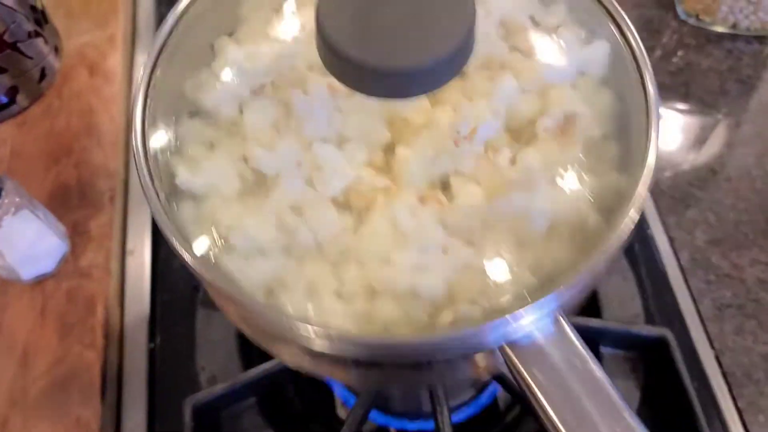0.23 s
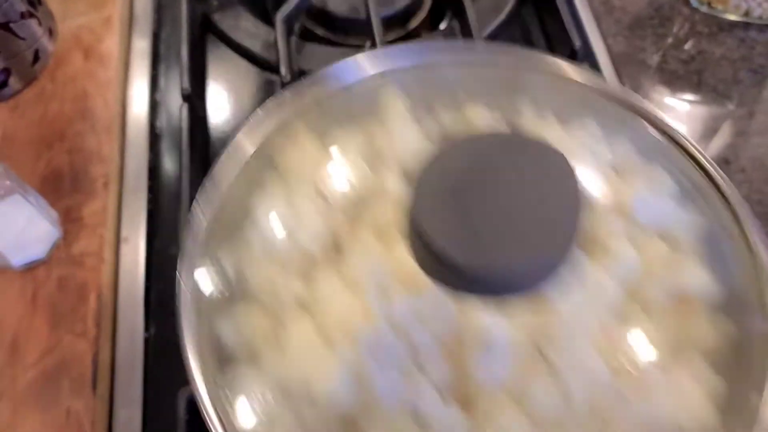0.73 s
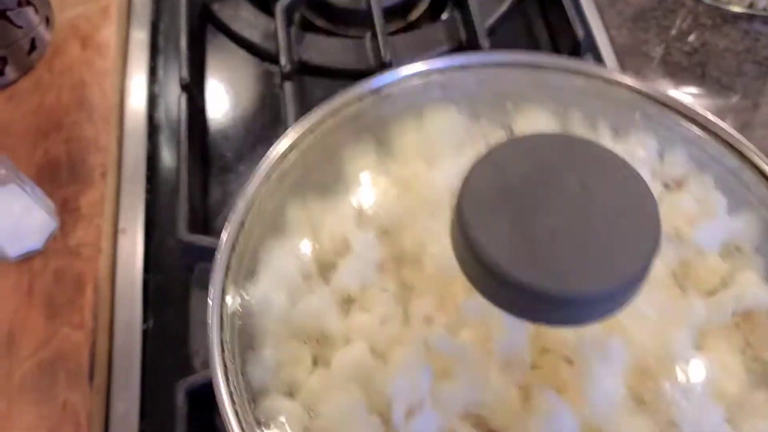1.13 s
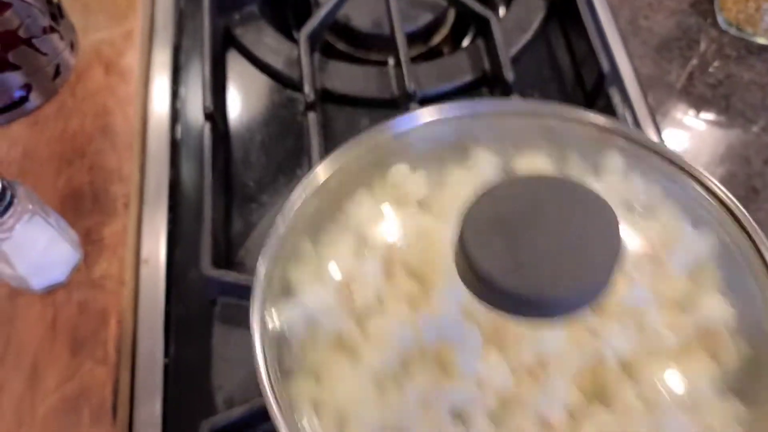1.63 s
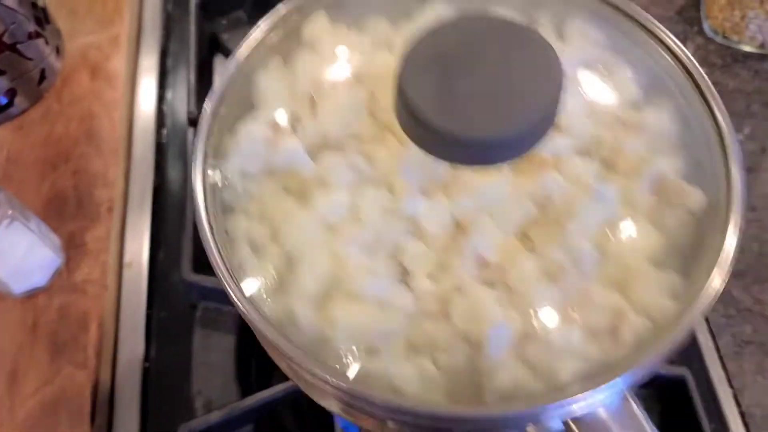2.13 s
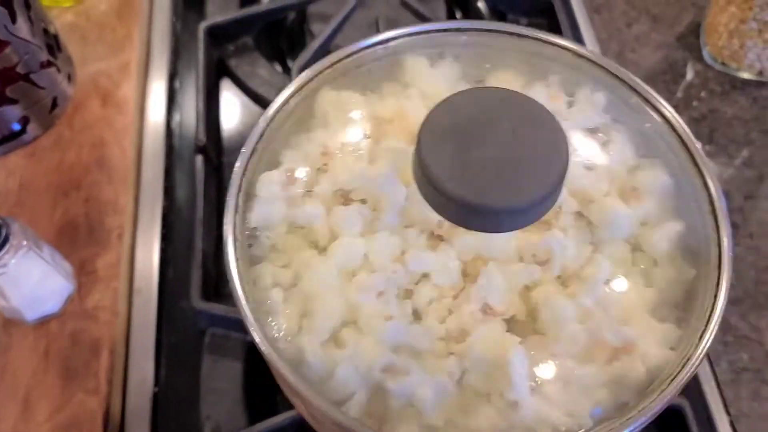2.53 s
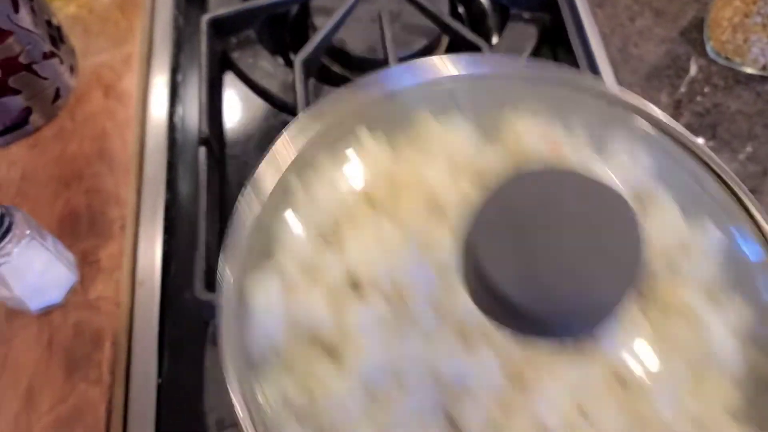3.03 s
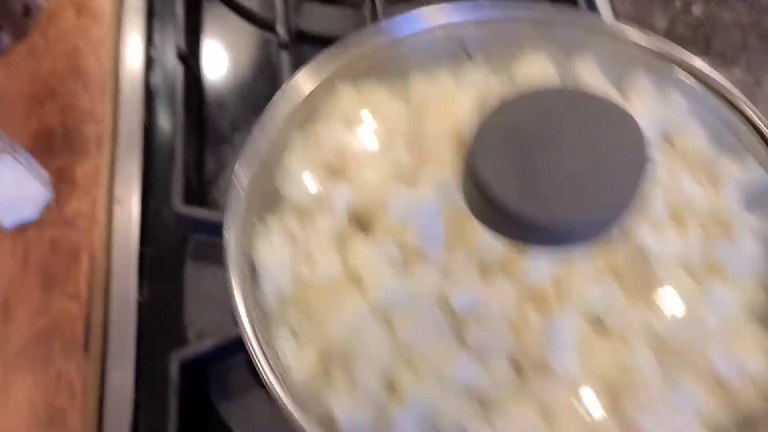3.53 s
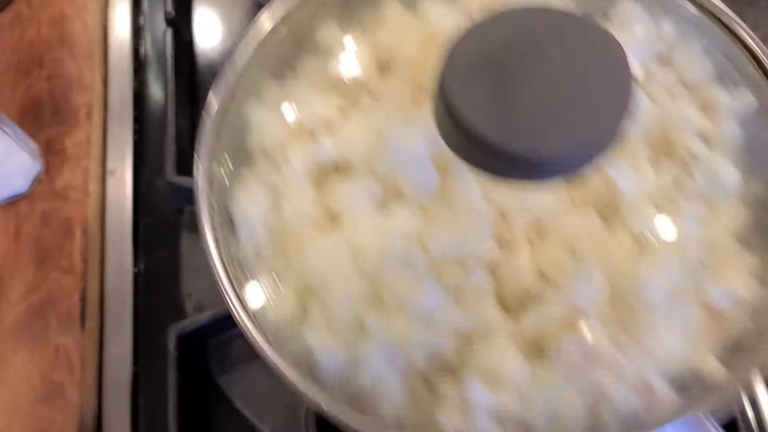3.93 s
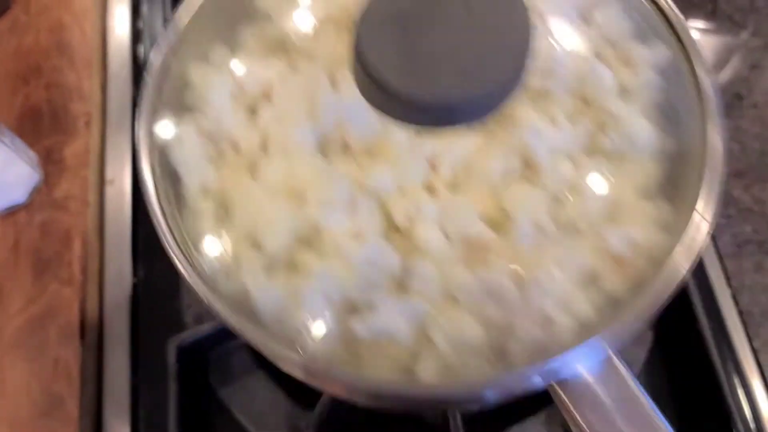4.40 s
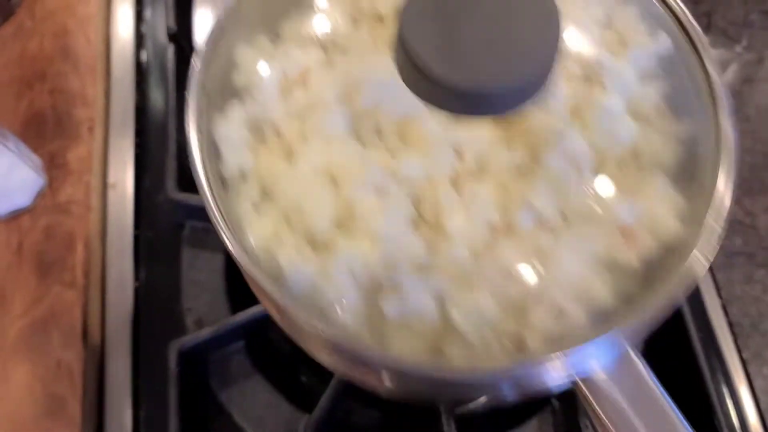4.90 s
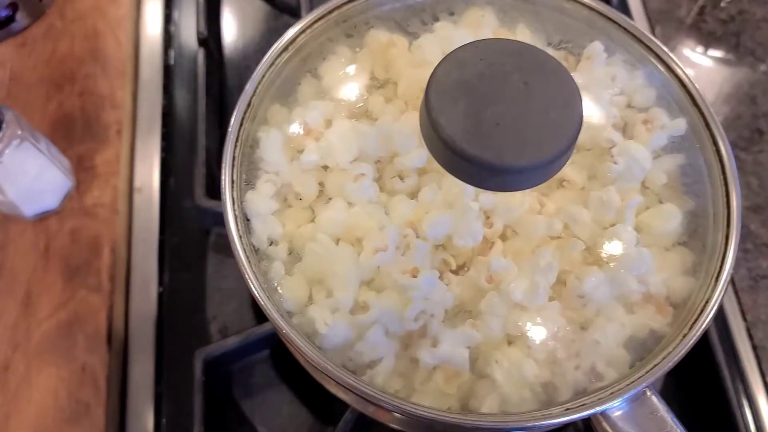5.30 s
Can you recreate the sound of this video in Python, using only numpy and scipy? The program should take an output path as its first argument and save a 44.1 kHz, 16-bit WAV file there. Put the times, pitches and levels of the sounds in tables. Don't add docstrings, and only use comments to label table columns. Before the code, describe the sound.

A steel pot of popcorn with a glass lid is shaken about five times a second, very close. Each stroke throws kernels in a dense, crunchy burst of metallic ticks, with low hollow thumps, lid knocks and occasional pops. A soft flame roars underneath. After five seconds the shaking stops and the pot clatters to rest in a small live kitchen.

```python
import sys
import numpy as np
from scipy import signal
from scipy.fft import rfft, irfft
from scipy.io import wavfile
from scipy.ndimage import uniform_filter1d

SR = 44100
rng = np.random.default_rng(int(sys.argv[2]) if len(sys.argv) > 2 else 0)


def store_wav(level_fs):
    pcm = np.round(np.clip(np.atleast_2d(level_fs), -1, 1) * 32767)
    wavfile.write(sys.argv[1], SR, pcm.T.astype(np.int16))


def natural_amplitude(level_db):
    exponent = np.asarray(level_db, float) / 20
    return 10 ** exponent


N = 245061

AIR_HZ = [215, 245, 321, 371, 393]
# (time [s], level [dB], fall time [ms], air thump [dB], strongest ring [Hz])
THROWS_AWAY = [(0.0336, -13, 6.5, -36.5, 2135), (.443, -15, 8.5, -35.5, 3510),
               (0.816, -15.5, 14.5, -27, 2130), (1.172, -15.5, 12.5, -29, 2110),
               (1.576, -18, 24, -36, 2770), (1.701, -17.5, 21, -22, 2470), (1.9929, -14, 9.5, -37, 2023),
               (2.3669, -17, 19.5, -28, 2092), (2.7602, -15, 17, -32, 2000), (3.1362, -14, 8, -33, 3650),
               (3.513, -13.5, 23, -25.5, 3790), (3.8976, -13.5, 13.5, -29, 2080),
               (4.2775, -19, 20.5, -34.5, 2000), (4.6678, -18, 11.5, -34.5, 1853),
               (5.0352, -20.5, 22, -32.5, 1660)]
# (time [s], level [dB], low push [dB], air thump [dB], air pitch [Hz])
POPS = [(0.1926, -27, -26, -27, 310), (0.3588, -26, -31, -36, 333), (.489, -19.5, -18.5, -30, 178),
        (1.1556, -23, -18, -25.5, 355), (1.5683, -26, -24, -20, 286), (1.6332, -23, -47, -21.5, 215),
        (1.8602, -23, -19.5, -30, 353), (2.0897, -38, -33, -34, 310), (2.2531, -23, -19.5, -27, 315),
        (2.532, -20.5, -26, -29.5, 348), (3.1963, -21.5, -25.5, -30, 310), (3.5797, -23.5, -17, -30, 314),
        (3.6547, -22.5, -21, -24.5, 222), (4.3442, -31.5, -23, -24.5, 223)]
# (time [s], level [dB], ring [Hz], air thump [dB], air pitch [Hz])
LID_POPS = [(.1375, -23.5, 1333, -30, 310), (1.1189, -24, 1470, -36, 408),
            (1.2083, -25.5, 3200, -22.5, 338), (1.5327, -26.5, 1350, -35.5, 314),
            (3.066, -22.5, 1670, -26, 348), (3.8333, -27, 1610, -32, 375), (5.0281, -23.5, 1466, -28, 350)]
# (time [s], level [dB], treble over level [dB], ring [Hz], air pitch [Hz])
RESTS = [
    (5.229, -25.5, -28, 1700, 309),
    (5.267, -22.5, -3.5, 3390, 381),
    (5.4135, -26, -17.5, 1667, 371),
]


def kernels(spots=8):
    # (frequency [Hz], level per Hz [dB])
    tick_colour = [(300, -4), (600, -10.5), (1000, -4), (2200, -8), (4000, -13.5), (5500, -20.5),
                   (8000, -45), (10000, -27)]
    # (frequency [Hz], level [dB], t60 [s])
    pot_modes = [(1112, -26, 0.14), (1398, -10, 0.094), (1670, 0.5, 0.083), (2060, -9, 0.18),
                 (2700, -13, 0.24), (2774, -5.5, 0.048), (3630, 0, 0.041), (6047, 0.5, 0.036),
                 (7000, -4, 0.054)]
    # (frequency [Hz], level [dB], t60 [s])
    rim_modes = [(8350, 10.5, 0.066), (11200, 2, 0.04)]
    # (frequency [Hz], level [dB], t60 [s])
    lid_modes = [(3390, -6, 0.092), (5260, -12.5, 0.066), (6540, -2.5, 0.035), (7540, -5.5, 0.081)]
    # (frequency [Hz], level [dB])
    ear_lean = [(500, -3.5), (1300, 4), (2400, 5.5), (6000, 9.5), (14000, -1.5)]
    ticks_per_s, bunch_db = 2200, 2
    air_db, air_t60_s = -11, 0.048

    size = evened(natural_amplitude(2.35 * np.minimum(rng.exponential(1, N), 3)) * (rng.random(N) < ticks_per_s / SR))
    size *= natural_amplitude(bunch_db * evened(uniform_filter1d(rng.standard_normal(N), size=160)) - 1.5)
    heads_s = np.array(bursts())[:, 0]
    size[np.round(heads_s * SR).astype(int) + 1] += 9.0
    ticks = size * rng.choice([-1., 1.], N)

    (wall, treble, lid, slide), favoured = swells(ticks)
    scrape = evened(band(size * rng.standard_normal((2, N)), 640, 1930))
    out = favoured + slide * scrape
    spot = rng.integers(0, spots, N)
    for k in range(spots):
        train = (ticks * (spot == k))[None]
        dull, fine = rng.standard_normal((2, 2, 6000))
        hard = colour(dull, tick_colour)
        knock = natural_amplitude(-3.5) * crack(hard, 0.0047) + natural_amplitude(-5.0) * crack(hard, 0.00036)
        knock += natural_amplitude(-7.5) * ring(pot_modes, 6.1, 0.00984)
        snap = crack(band(fine, 4600, 20700), 0.009) + natural_amplitude(-8.5) * ring(rim_modes, 0.69, 0.0101)
        glass = ring(lid_modes, 1.0, 0.0069)
        for strength, shape in ((wall, knock), (treble, snap), (lid, glass)):
            out += signal.oaconvolve(train * strength, shape, axes=1)[:, :N]

    air = ring([(hz, 0, air_t60_s) for hz in AIR_HZ], 2.3, 0.016)[0]
    out += natural_amplitude(air_db) * signal.oaconvolve(ticks * wall, air)[:N]
    lean = np.array(ear_lean) * [1, .5]
    return natural_amplitude(2.5) * np.array([colour(out[0], lean), colour(out[1], lean * [1, -1])])


def swells(ticks):
    lead_s = .05
    power, favoured = np.zeros((4, N + SR)), np.zeros((2, N + SR))
    t = np.arange(-lead_s, .2, 1 / SR)
    start = round(lead_s * SR)
    padded = np.pad(ticks, (start, SR))
    for s, db, treble_db, hz, fall_ms, ring_db in bursts():
        fall_ms = max(fall_ms, 2)
        blow = natural_amplitude(db + np.where(t < 0, 90000 * t / fall_ms - 7.0, -11000 * t / fall_ms))
        settle = (t > 0) * natural_amplitude(db - 14 - 510 * t)
        add(power[:2], s, natural_amplitude([[0], [treble_db]]) ** 2 * (blow ** 2 + settle ** 2))
        lid_db = 1.72 * min(treble_db, -3) + 2.0
        add(power[2], s, (blow * natural_amplitude(lid_db)) ** 2)
        strikes = (blow * padded[round(s * SR):][:len(t)])[None]
        mode = ring(2 * [(hz, 0, .05)], 2.5, 0.013)[:, :3000]
        add(favoured, s, natural_amplitude(ring_db) * signal.oaconvolve(strikes, mode, axes=1))
    for s, db, *_ in THROWS_AWAY:
        add(power[3], s, (t < 0) * natural_amplitude(db - 11 + 700 * t) ** 2)
    return np.sqrt(power[:, start:start + N]), favoured[:, start:start + N]


def crack(scatter, decay_s):
    return unit(scatter * np.exp(-np.arange(6000) / SR / decay_s))


def ring(modes, spread_db, detune):
    t = np.arange(6000) / SR
    hz, db, t60 = np.transpose(modes)[:, :, None]
    hz = hz * (1 + detune * rng.standard_normal(hz.shape))
    height_db = db + spread_db * rng.standard_normal((2, len(modes), 1))
    phase = 2 * np.pi * rng.random((2, len(modes), 1))
    tones = natural_amplitude(height_db - 60 * t / t60) * np.sin(2 * np.pi * hz * t + phase)
    onset = 1 - np.exp(-t / 0.000098)
    return unit(tones.sum(1) * onset)


def bursts():
    # (time [s], level [dB], fall time [ms], ring [Hz])
    lid_knocks = [(.221, -33, 17, 1780), (.625, -25, 3.5, 1790), (.9736, -22.5, 21, 1660),
                  (1.3607, -23, 3, 1780), (1.5528, -32, 36, 1390), (1.761, -35, 15, 2700),
                  (2.169, -29.5, 7.5, 1760), (2.483, -34.5, 18, 2440), (2.5452, -24, 12, 2700),
                  (2.9364, -31.5, 8, 2770), (3.3125, -31.5, 9, 2680), (3.6864, -34.5, 9, 1100),
                  (3.7577, -33, 0, 2770), (4.074, -32.5, 10, 2780), (4.4529, -30, 7, 2840),
                  (4.848, -35, 29, 2730)]
    # (time [s], level [dB])
    oil_spits = [
        (.5402, -49),
        (2.104, -49),
        (2.129, -47),
        (4.18, -59),
        (4.5649, -50),
    ]
    lands = [(s, db, kind[0], hz, fall_ms, kind[1]) for s, db, fall_ms, hz, _, _, kind in loads()]
    pops = [(s, db, -6.5, 1415, 8.1, -11) for s, db, *_ in POPS]
    lid_pops = [(s, db, -8, hz, 10.5, -0.5) for s, db, hz, *_ in LID_POPS]
    knocks = [(s, db, -36, hz, fall_ms, -2) for s, db, fall_ms, hz in lid_knocks]
    spits = [(s, db, 11, 2700, 3, -10) for s, db in oil_spits]
    rests = [(s, db, treble_db, hz, 22.3, -4) for s, db, treble_db, hz, _ in RESTS]
    return lands + pops + lid_pops + knocks + spits + rests


def loads():
    # (time [s], level [dB], fall time [ms], air thump [dB], air pitch [Hz])
    throws_back = [(0.2531, -16, 16.5, -29, 290), (0.6488, -15.5, 15, -23, 259),
                   (1.0063, -15, 16, -27, 324), (1.3875, -17.5, 8.5, -27.5, 276),
                   (1.7995, -16, 16.5, -26, 215), (2.198, -15, 17, -34, 312),
                   (2.577, -15.5, 11.5, -22.5, 223.6), (2.9668, -17, 18.5, -26.5, 300),
                   (3.3415, -15.5, 12.5, -23.5, 227), (3.7252, -17, 13, -28, 321),
                   (4.108, -15.5, 17, -26, 230), (4.4857, -15.5, 14, -30, 223),
                   (4.8801, -17, 14, -26.5, 235.6)]
    # (time [s], level [dB], fall time [ms], air thump [dB], air pitch [Hz])
    clumps = [(0.0251, -27, 18, -31.5, 422), (.055, -23.5, 3, -31, 263), (.2701, -26, 15, -48, 290),
              (0.427, -24.5, 39, -31, 396), (.452, -21, 17, -36, 408), (.67, -17, 5, -42, 240),
              (0.841, -29, 0, -33, 274), (1.0135, -23, 9, -47, 264), (1.0282, -25.5, 7, -27.5, 248),
              (1.1888, -21.5, 25.5, -35, 240), (1.3949, -17.5, 15.5, -36, 248),
              (1.7128, -15, 16.5, -35, 302), (1.985, -29, 12, -27, 325), (2.215, -23, 4, -29.5, 220),
              (2.6066, -33, -2, -38, 245), (3.1572, -17, 5, -31.5, 312), (3.3615, -27, 21, -30, 283),
              (4.094, -26.5, 17, -25.5, 230), (4.272, -30, 3, -26.5, 326), (4.505, -18.5, 3.5, -31, 302),
              (4.659, -32.5, 17, -32, 305), (4.91, -34.5, 22, -44, 243), (5.0575, -18.5, 9, -38.5, 302),
              (5.0634, -17.5, 10.5, -26, 298)]
    # (treble over level [dB], ring over level [dB], air t60 [s], low push over level [dB])
    away = (-14, -7.5, 0.08, -24)
    back = (-13, -8.5, 0.05, -37)
    clump = (-15, -7, 0.03, -20)
    away_air_hz, back_ring_hz, clump_ring_hz = 223, 2770, 2708
    far = [(s, db, fall_ms, hz, air_db, away_air_hz, away) for s, db, fall_ms, air_db, hz in THROWS_AWAY]
    near = [(s, db, fall_ms, back_ring_hz, air_db, hz, back) for s, db, fall_ms, air_db, hz in throws_back]
    loose = [(s, db, fall_ms, clump_ring_hz, air_db, hz, clump) for s, db, fall_ms, air_db, hz in clumps]
    return far + near + loose


def thumps():
    air, pot = np.zeros(N), np.zeros(N)
    t = np.arange(0, .25, 1 / SR)
    for s, db, hz, t60, push_db in jolts():
        pick, phase = rng.random(2)
        fade = natural_amplitude(db + 14.5 - 60 * t / t60) * (1 - np.exp(-t / 0.0019))
        other_hz = AIR_HZ[int(pick * len(AIR_HZ))]
        tones = np.sin(2 * np.pi * hz * t) + .5 * np.sin(2 * np.pi * (other_hz * t + phase))
        add(air, s - .001, fade * tones)
        push_hz = 95 + 45 * phase
        add(pot, s - .001, natural_amplitude(push_db + 6 - 60 * t / 0.03) * np.sin(2 * np.pi * push_hz * t))
    return band(air, 128, 1250) + pot


def jolts():
    lag_s = lead_s = .0015
    lands = [(s + lag_s, air_db, hz, kind[2], db + kind[3]) for s, db, _, _, air_db, hz, kind in loads()]
    pops = [(s - lead_s, air_db, hz, 0.032, push_db) for s, _, push_db, air_db, hz in POPS]
    lid_pops = [(s - lead_s, air_db, hz, 0.082, db + 2.5) for s, db, _, air_db, hz in LID_POPS]
    rests = [(s - lead_s, -23, hz, 0.068, -27) for s, *_, hz in RESTS]
    return lands + pops + lid_pops + rests


def simmer():
    # (frequency [Hz], level per Hz [dB])
    flame_colour = [(24, -44), (40, 3), (220, 0), (329, 0), (556, -9.5), (2700, -3), (3060, -5.5),
                    (13800, -28), (16000, -56)]
    # (time [s], level [dB])
    steam = [
        (.4, -53),
        (.8, -72),
        (1.75, -64),
        (1.95, -48),
        (2.25, -45),
        (2.6, -79),
        (5.56, -81),
    ]
    s, hiss_db = np.transpose(steam)
    noise = rng.standard_normal((2, N))
    noise += 2.5 * band(rng.standard_normal(N), 30, 720)
    flicker_db = 2.0 * evened(uniform_filter1d(rng.standard_normal(N), 1500))
    roar = evened(colour(noise, flame_colour)) * natural_amplitude(-47 + flicker_db)
    hiss = evened(band(rng.standard_normal((2, N)), 5900, 21500))
    hiss *= natural_amplitude(np.interp(np.arange(N) / SR, s, hiss_db))
    spurts = np.repeat(rng.exponential(1, N // 32 + 1), 32)[:N]
    return roar + hiss * natural_amplitude(2.9 * np.minimum(spurts, 5) - 5)


def kitchen(x):
    # (frequency [Hz], t60 [s])
    tail_t60 = [(100, 0.36), (2500, 0.37), (6000, 0.42), (14000, 0.26)]
    out, turn = np.zeros((2, N)), np.pi * 2.3 * np.arange(N) / SR
    for k in range(3):
        taps = np.zeros((2, SR // 2))
        at = np.arange(200, SR // 2 - 20, 20) + rng.integers(0, 20, (2, (SR // 2 - 201) // 20))
        np.put_along_axis(taps, at, rng.choice([-1., 1.], at.shape), 1)
        hz, t, z = signal.stft(taps, SR, nperseg=256)
        fade = natural_amplitude(-60 * t / read(tail_t60, hz)[:, None])
        tail = signal.istft(z * fade, SR, nperseg=256)[1]
        share = np.sqrt(2 / 3) * np.cos(turn + k * np.pi / 3)
        out += signal.fftconvolve(x * share, unit(tail), axes=1)[:, :N]
    return out


def evened(x):
    return x / np.sqrt(np.mean(x ** 2) + 1e-20)


def unit(x):
    return x / np.linalg.norm(x, axis=-1, keepdims=True)


def read(points, hz):
    f, value = np.transpose(points)
    return np.interp(np.log(hz + 1), np.log(f + 1), value)


def colour(x, points):
    size = x.shape[-1]
    return irfft(rfft(x) * natural_amplitude(read(points, np.fft.rfftfreq(size, 1 / SR))), size)


def band(x, lo_hz, hi_hz, order=2):
    return signal.sosfilt(signal.butter(order, [lo_hz, hi_hz], "band", fs=SR, output="sos"), x)


def add(mix, s, sound):
    part = mix[..., round(max(s, 0) * SR):][..., :sound.shape[-1]]
    part += sound[..., :part.shape[-1]]


def scene():
    ticks, air = kernels(), thumps()
    echo = kitchen(natural_amplitude(-15.5) * ticks + natural_amplitude(-9.5) * air[None])
    return ticks + air + echo + simmer()


def band_limit(x):
    return signal.sosfilt(signal.butter(12, 16620, fs=SR, output="sos"), x)


def record(dry):
    # (frequency [Hz], level [dB])
    port_difference = [(100, -14), (450, -7.5), (1300, -0.5)]
    # (frequency [Hz], level [dB])
    mic_response = [(25, -22), (70, -2.5), (14500, 0), (14800, -24), (16500, -48)]
    mid, side = dry.mean(0), colour((dry[0] - dry[1]) / 2, port_difference)
    heard = colour(np.array([mid + side, mid - side]), mic_response)
    limited = np.tanh(heard / 1.112) * 1.277
    return band_limit(limited)


dry = scene()
out = record(dry)
store_wav(out)
```